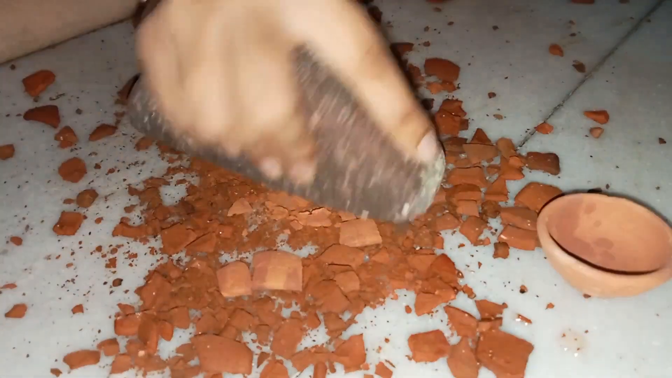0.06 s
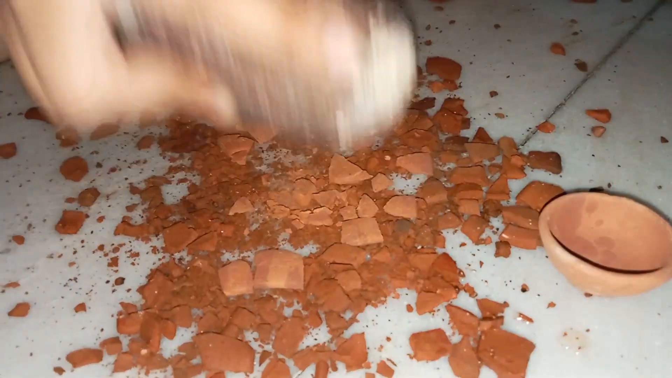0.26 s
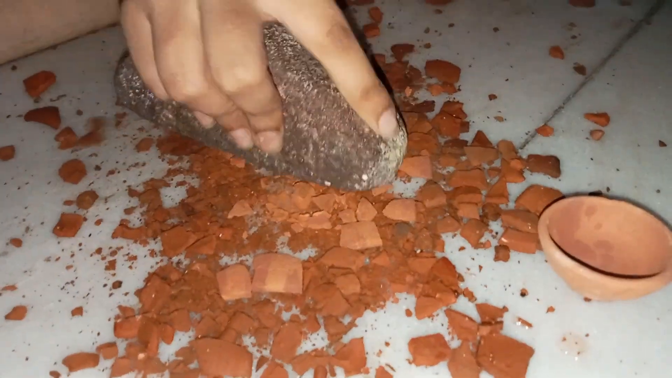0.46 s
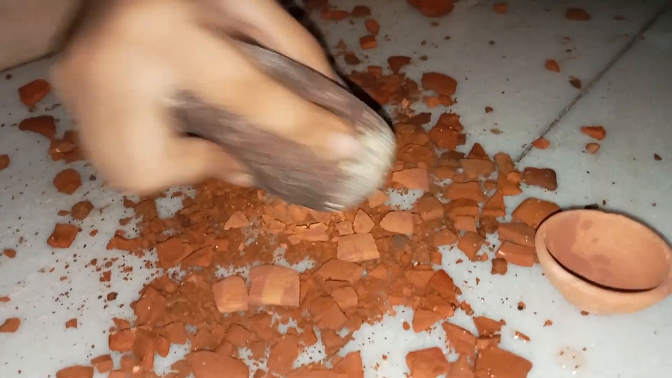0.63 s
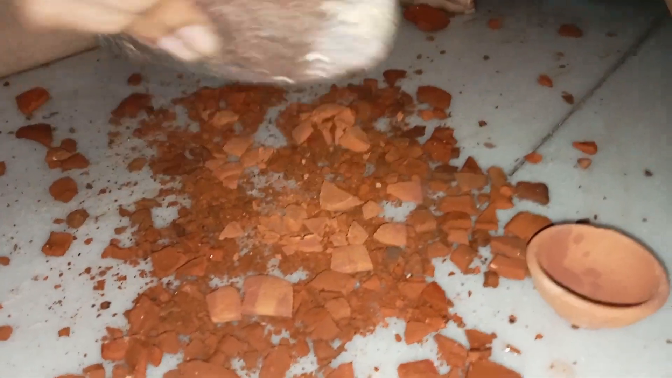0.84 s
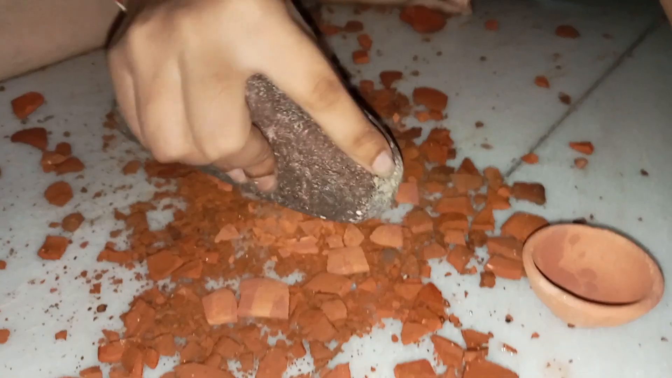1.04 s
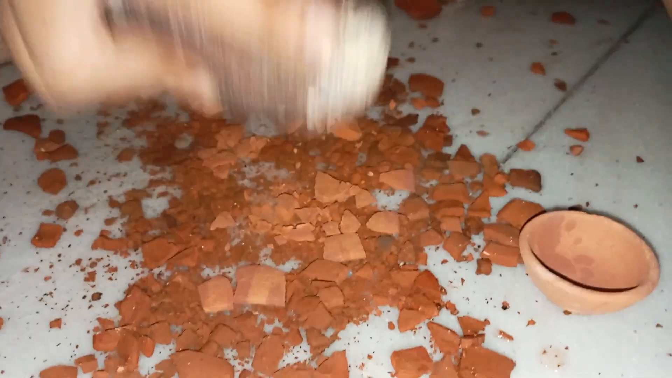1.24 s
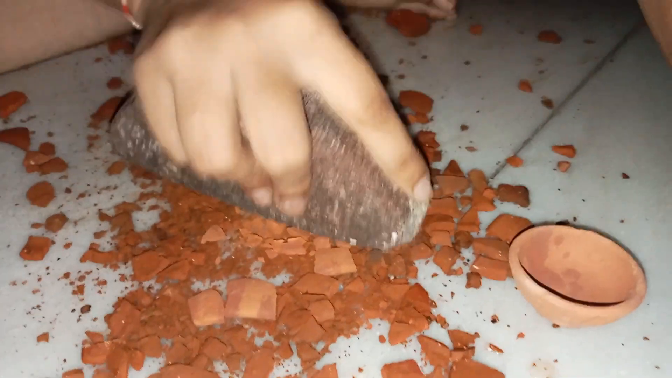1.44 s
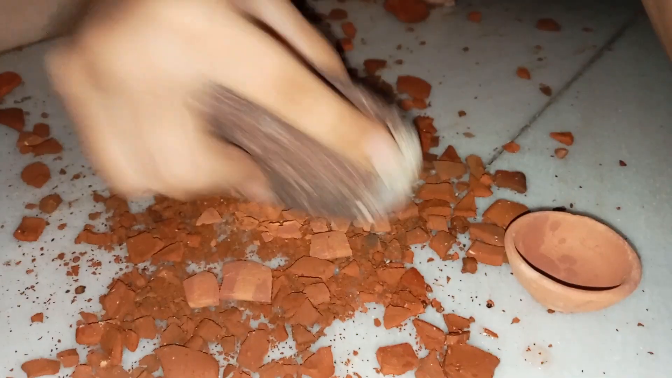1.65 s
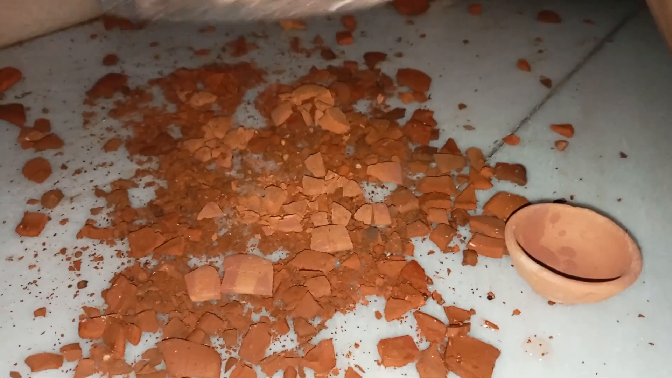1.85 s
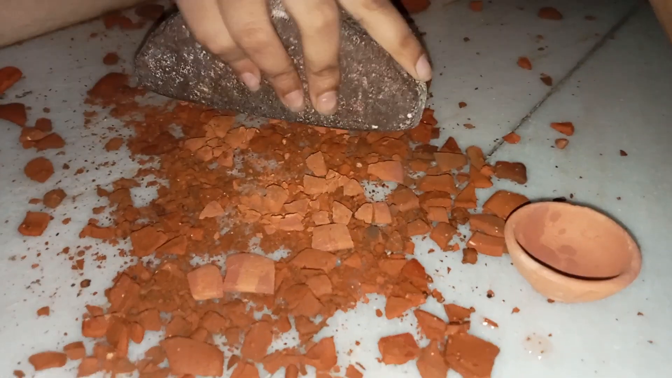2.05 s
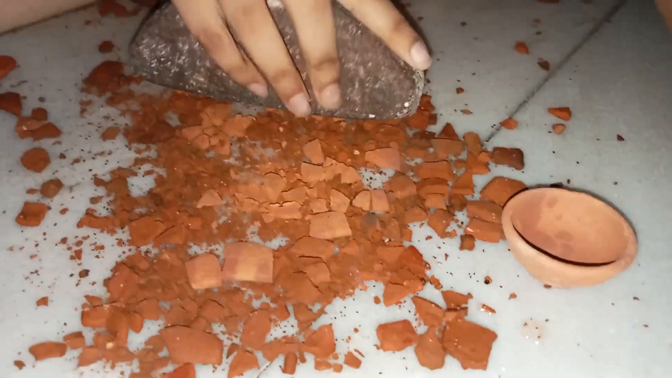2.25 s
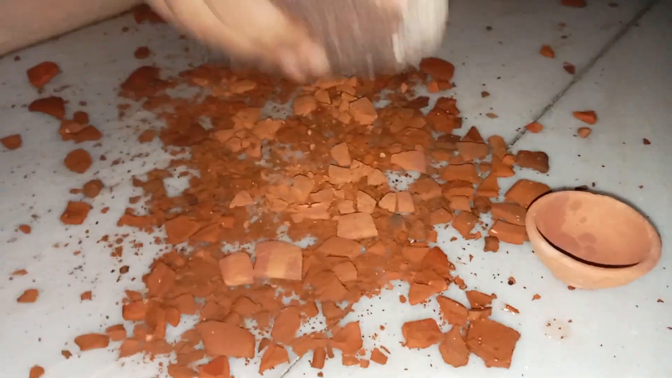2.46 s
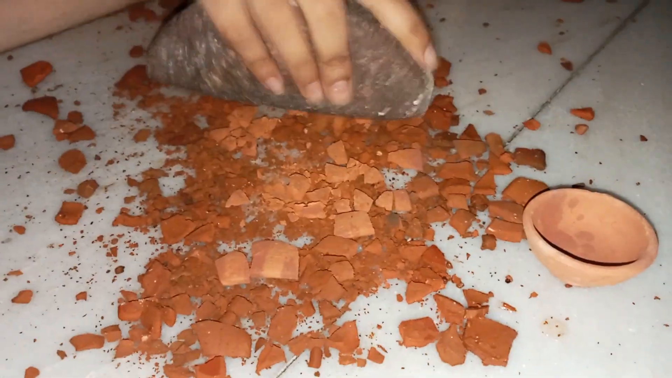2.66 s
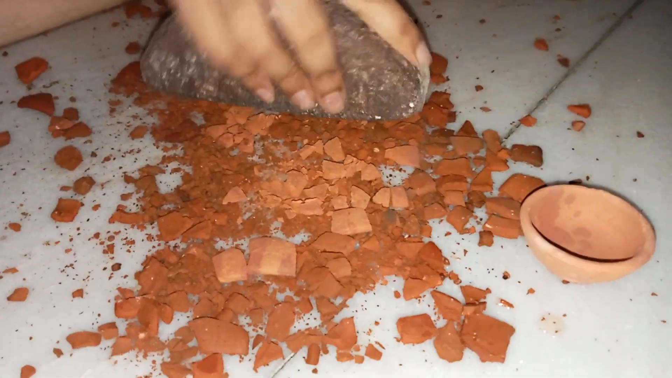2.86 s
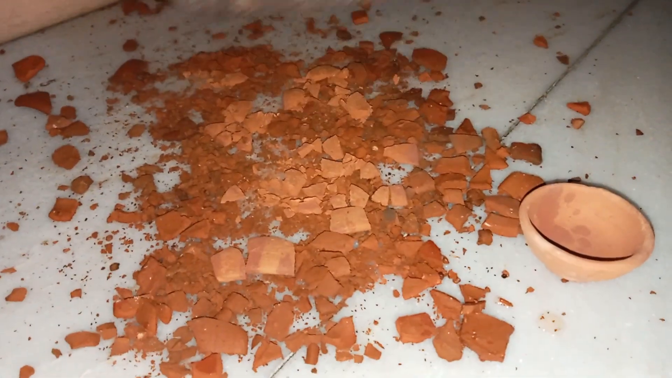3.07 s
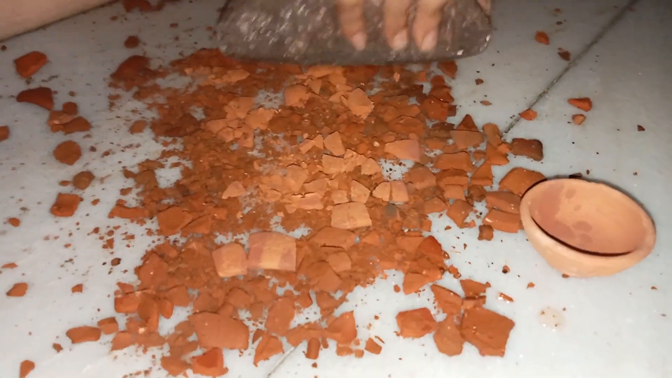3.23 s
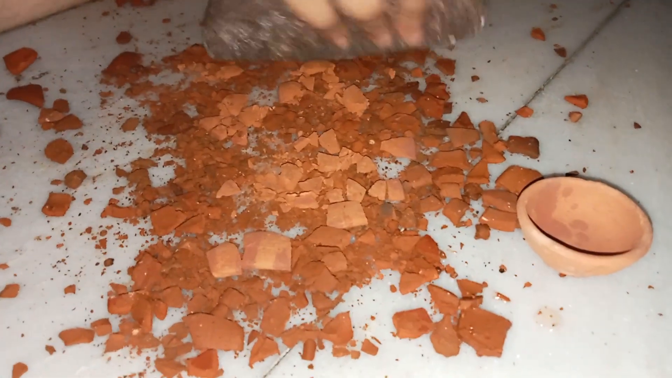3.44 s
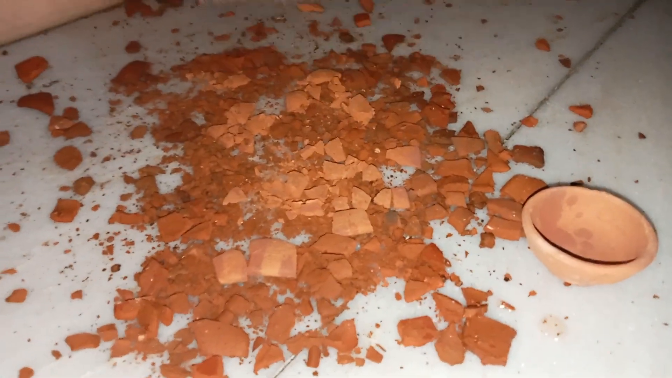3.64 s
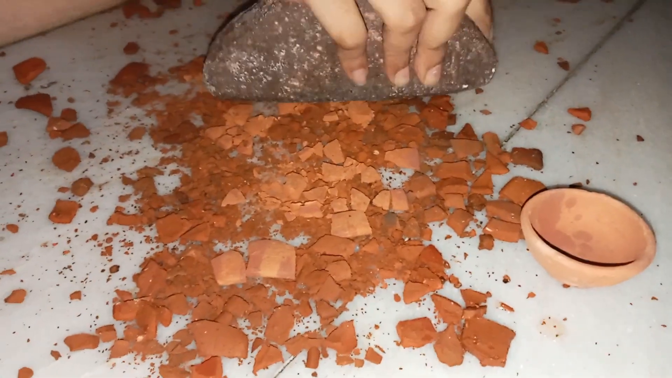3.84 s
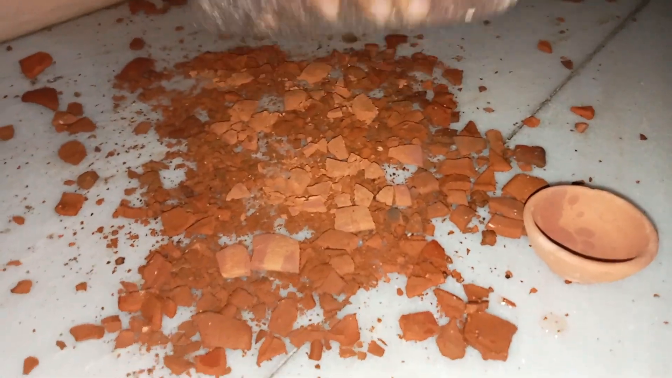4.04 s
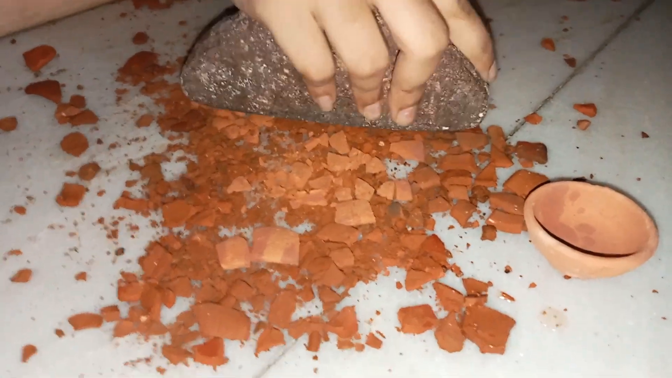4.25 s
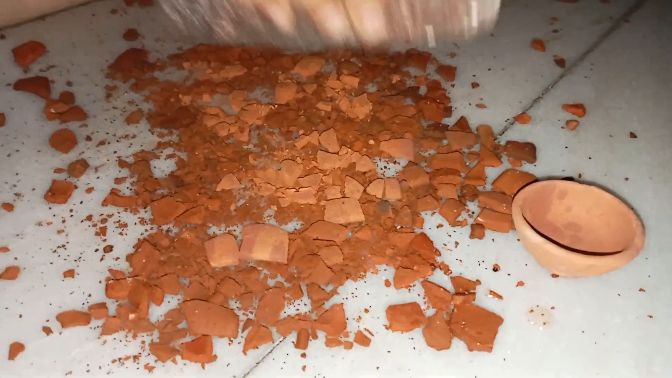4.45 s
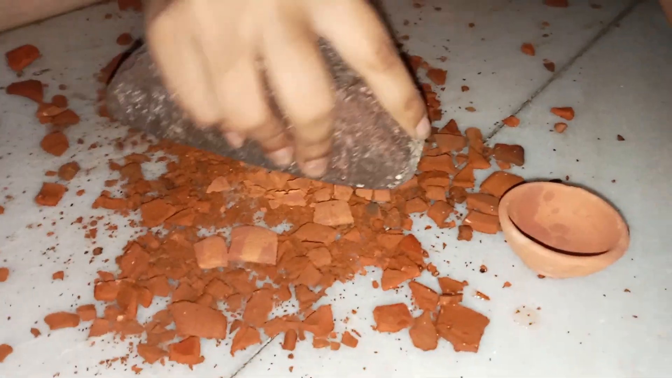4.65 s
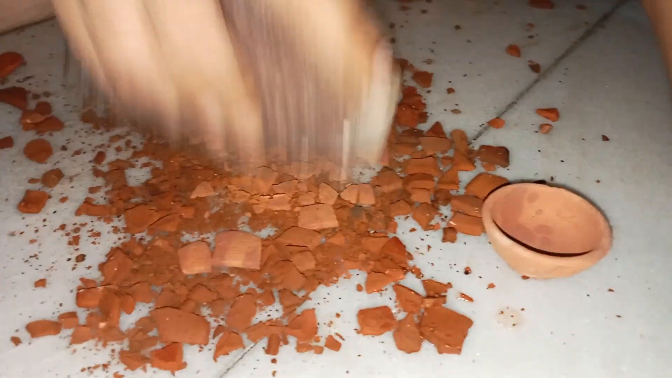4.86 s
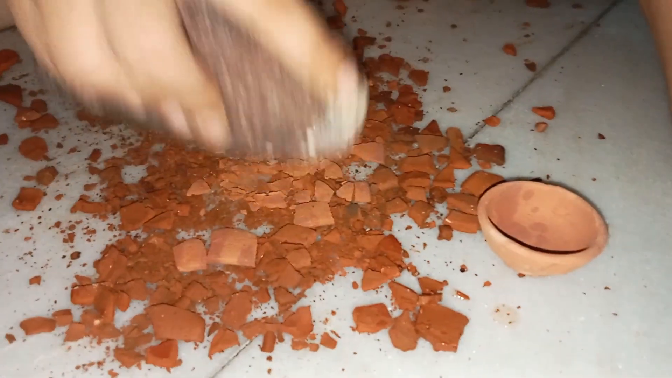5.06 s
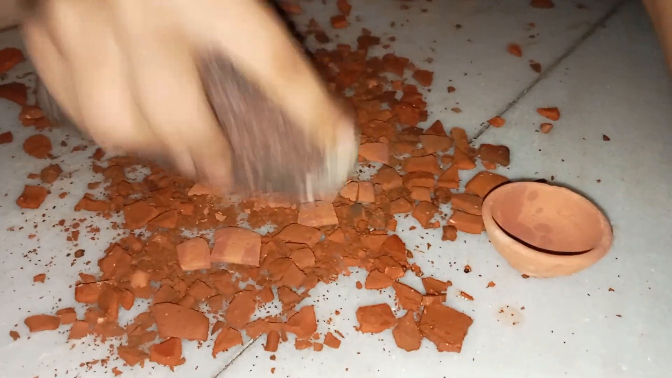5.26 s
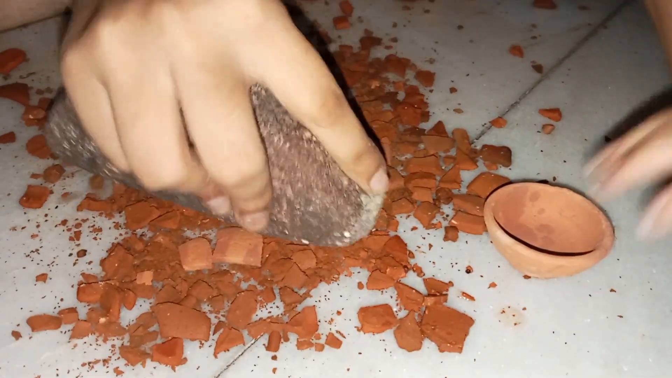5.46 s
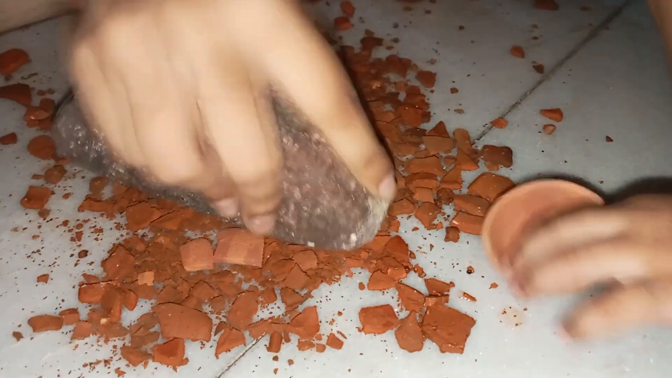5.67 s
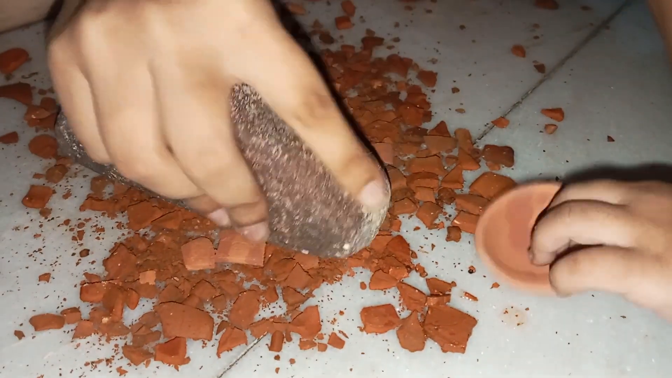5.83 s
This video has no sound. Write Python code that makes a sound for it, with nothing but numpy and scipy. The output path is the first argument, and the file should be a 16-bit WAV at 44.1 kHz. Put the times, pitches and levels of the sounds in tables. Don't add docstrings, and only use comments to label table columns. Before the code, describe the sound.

Fourteen heavy stone blows crack brittle pottery on tile, close and distorted, with ringing room echo, small rebounds and scattering chips.

```python
import sys
import numpy as np
from scipy import signal
from scipy.io import wavfile

SR = 44100
rng = np.random.default_rng(int(sys.argv[2]) if len(sys.argv) > 2 else 0)


def file_out(sig):
    cols = np.atleast_2d(sig).T
    lim = np.clip(cols, -1, 1)
    pcm = np.round(lim * 32767).astype(np.int16)
    wavfile.write(sys.argv[1], SR, pcm)


def attenuation_scalar(level_db):
    decades = np.asarray(level_db, float) / 20
    return 10 ** decades


N = 260190
BUILD_S, BEND = 0.0016, 1.237


def rms_one(x):
    return x / np.sqrt(np.mean(x ** 2) + 1e-20)


def add(out, s, piece):
    at = round(s * SR)
    out[..., at:at + piece.shape[-1]] += piece[..., :N - at]


def at_hz(points, hz, col=1):
    points = np.array(points)
    return np.interp(np.log(hz), np.log(points[:, 0]), points[:, col])


def ring(x, hz, t60):
    r, w = attenuation_scalar(-60 / (t60 * SR)), 2 * np.pi * hz / SR
    return signal.lfilter([0, np.sin(w)], [1, -2 * r * np.cos(w), r * r], x + 1e-18)


def peak(x, hz, width_hz):
    r = np.exp(-np.pi * width_hz / SR)
    top = np.array([1, 0, -1]) * (1 - r * r) / 2
    return signal.lfilter(top, [1, -2 * r * np.cos(2 * np.pi * hz / SR), r * r], x + 1e-18)


def double_peak(x, hz, width_hz):
    return peak(peak(x, hz, width_hz), hz, width_hz)


def port(x):
    return peak(peak(x, 9000, 2440), 9460, 2440) - attenuation_scalar(-10) * double_peak(x, 14500, 3500)


def grains(per_s, spread_db):
    sizes = attenuation_scalar(spread_db * np.minimum(rng.exponential(1, N), 4)) * rng.choice([-1, 1], N)
    return rms_one(sizes * (rng.random(N) < per_s / SR))


def bands():
    edges = np.r_[30 * 2 ** np.arange(0, 6, 1 / 3), 1920 * 2 ** np.arange(0, 3.2, 1 / 8)]
    white = rng.standard_normal((2, N))
    noises = []
    for k, (low, high) in enumerate(zip(edges, edges[1:])):
        sos = signal.butter(2, [low, high], "band", fs=SR, output="sos")
        noises.append((np.sqrt(low * high), high - low, rms_one(signal.sosfilt(sos, white[k % 2]))))
    return noises


# (frequency [Hz], level [dB per Hz])
HUSH = [(30, -27), (60, -2.5), (110, 3), (200, 3.5), (500, -5.5), (1000, -7), (2800, -10.5), (4500, -19),
        (5100, -37), (7000, -47.5), (9600, -36), (12000, -45), (16000, -51.5)]


def hush(noises):
    air = sum(attenuation_scalar(at_hz(HUSH, hz)) * np.sqrt(width_hz) * np.roll(noise, SR) for hz, width_hz, noise in noises)
    return attenuation_scalar(-48) * rms_one(air)


# (frequency [Hz], t60 [s], level [dB])
ROOM = [(57, 0.5, -54), (102, 0.52, -34), (194, 0.51, -28), (467, 0.58, -28.5), (704, 0.55, -27),
        (1240, 0.51, -32.5), (2315, 0.55, -52), (3320, 0.57, -52), (4160, 0.47, -45.5), (5090, 0.51, -69),
        (7100, 0.16, -71), (9820, 0.43, -51.5), (12270, 0.11, -55), (15000, 0.31, -56.5)]
# (frequency [Hz], level [dB], t60 [s])
STANDING = [(101.56, -25, 1), (106.05, -20.5, 0.77), (140.15, -8, 0.52), (159.4, -7, 0.53), (186, -25, 0.7),
            (246, -52, 0.21), (309, -21, 0.15)]
SAME_PATH_HZ = 330
ECHO_LAG_S, LEFTOVER_DB = 0.0021, -24


def room(noises):
    t, out = np.arange(SR) / SR, np.zeros(N)
    build = 1 - np.exp(-t / BUILD_S)
    starts = np.r_[0, np.array(THUDS)[:, 0] + ECHO_LAG_S]
    lump_spread_db = [2.0 if hz < 5000 else 4.5 for hz, *_ in noises]
    lumps_db = rng.standard_normal((len(starts), len(noises))) * lump_spread_db
    for k, (hz, _, noise) in enumerate(noises):
        fade = attenuation_scalar(-60 * (t / at_hz(ROOM, hz)) ** BEND) * build
        power = np.zeros(N)
        clay = np.clip(np.log(hz / 1250) / np.log(1900 / 1250), 0, 1)
        levels_db = np.r_[LEFTOVER_DB, (1 - clay) * thud_db(hz)[:, 0] + clay * crack_db(hz)]
        for s, level_db, lump_db in zip(starts, levels_db, lumps_db[:, k]):
            gain = attenuation_scalar(level_db + at_hz(ROOM, hz, col=2))
            if hz < SAME_PATH_HZ:
                add(out, s, gain * fade * noise[SR:2 * SR])
            else:
                add(power, s, (gain * attenuation_scalar(lump_db) * fade) ** 2)
        out += noise * np.sqrt(power)
    click = np.eye(1, SR)[0]
    standing = sum((-1) ** k * attenuation_scalar(level_db) * ring(click, hz, t60)
                   for k, (hz, level_db, t60) in enumerate(STANDING))
    for s, level_db in zip(starts, np.r_[LEFTOVER_DB, thud_db(120)[:, 0]]):
        add(out, s, attenuation_scalar(level_db - 12) * build * standing)
    return out


# (middle [s], half length [s], level [dB])
DUST = [
    (.68, 0.14, -53),
    (0.965, 0.12, -51),
    (1.368, 0.074, -64),
    (2.49, 0.037, -61),
    (3.238, 0.054, -64.5),
    (3.448, .05, -56),
    (5.097, .008, -48),
    (5.152, .015, -56),
    (5.24, .01, -58),
    (5.83, .05, -71),
]


def dust():
    t = np.arange(N) / SR
    flow = sum(attenuation_scalar(level_db - 3) * np.exp(-((t - s) / half_s) ** 2) for s, half_s, level_db in DUST)
    return port(flow * grains(3400, spread_db=4.0))


# (time [s], peak level [dB], pitch [Hz])
BUMPS = [
    (2.428, -39, 62),
    (2.471, -38, 146),
]


def bumps():
    out, age = np.zeros(N), np.arange(4000) / SR
    for s, level_db, hz in BUMPS:
        swell = age / 0.01 * np.exp(-age / 0.0088)
        add(out, s, attenuation_scalar(level_db + 11.5) * swell * np.sin(2 * np.pi * hz * age))
    return out


# (time [s], bright peak level [dB], ring level [dB], ring pitch [Hz])
CHIPS = [(0.7144, -44, -45, 4030), (0.7861, -54, -31, 2900), (0.8114, -70, -13, 3200),
         (0.844, -35, -47, 3110), (1.1794, -55, -45, 2800), (1.2236, -49, -49, 2800),
         (1.6894, -56, -45, 2870), (1.7345, -53, -46, 2960), (2.387, -61, -25, 4600),
         (3.0394, -56, -51, 3220), (3.473, -40, -48, 3280), (5.2366, -64, -32, 4200),
         (5.284, -37, -30, 4500), (5.8286, -96, -40, 2800), (5.884, -48, -14, 4350)]


def chips():
    out, spits, age = np.zeros(N), np.zeros(N), np.arange(600) / SR
    for s, bright_db, ring_db, hz in CHIPS:
        add(spits, s, attenuation_scalar(bright_db + 3.5) * np.exp(-age / 0.0026))
        swell = age / 0.001 * np.exp(-age / 0.001)
        add(out, s, attenuation_scalar(ring_db - 16) * swell * np.sin(2 * np.pi * hz * age))
    spits = spits * grains(12000, spread_db=3.0)
    return out + port(spits) + attenuation_scalar(-8) * peak(spits, 5000, 4000)


def spray():
    age, flow = np.arange(SR // 2) / SR, np.zeros(N)
    fade_s = 0.13
    add(flow, 0.542, attenuation_scalar(-35.5) * np.exp(-(age / fade_s) ** 1.46))
    return double_peak(flow * grains(5000, spread_db=2.5), 7110, 8000)


# (time [s], pitch [Hz], level [dB])
SINGERS = [(0.058, 5600, -52), (0.058, 9250, -49.5), (0.54, 5020, -41.5), (0.54, 5850, -45),
           (0.54, 7100, -43.5), (0.54, 8470, -47.5), (1.045, 7250, -59), (1.045, 11500, -54),
           (2.072, 7170, -54.5), (2.072, 10500, -51), (2.072, 11820, -49.5), (2.072, 15440, -59.5),
           (2.758, 11060, -55), (4.265, 9400, -53.5), (5.53, 10360, -55), (3.304, 9180, -42),
           (5.53, 8200, -55), (5.775, 9900, -59), (5.775, 4350, -55)]


def singers():
    out, age = np.zeros(N), np.arange(SR // 2) / SR
    rattle = grains(6000, spread_db=3.5)
    width_hz, t60_s = 550, 0.38
    for k, (s, hz, level_db) in enumerate(SINGERS):
        band = double_peak(np.roll(rattle, k * 9001)[:len(age)], hz, width_hz)
        fade = attenuation_scalar(level_db - 60 * (age / t60_s) ** BEND) * (1 - np.exp(-age / BUILD_S))
        add(out, s, fade * rms_one(band))
    return out


# (time [s], peak level [dB], pitch [Hz])
REBOUNDS = [(0.0692, -8, 2400), (0.551, -8, 2010), (1.055, -16, 2300), (1.5467, -0.5, 2600),
            (2.084, -6.5, 2620), (2.7674, -9, 2260), (3.3174, -31, 2100), (3.8377, -8, 2300),
            (4.2774, -19, 2440), (4.693, -14, 2270), (5.01, -3.5, 2320), (5.2821, -9.5, 2430),
            (5.5414, -32, 2340), (5.786, -8.5, 2330)]


def rebounds():
    u, out = np.arange(1000) / SR / 0.0014, np.zeros(N)
    grit = grains(12000, spread_db=2.5)
    for s, level_db, hz in REBOUNDS:
        bite = attenuation_scalar(level_db + 13.5) * u * np.exp(-u) * grit[round(s * SR):][:len(u)]
        burst = double_peak(bite, hz, 800) + attenuation_scalar(-13.5) * double_peak(bite, 4300, 1800)
        add(out, s - 0.001, burst)
    return signal.sosfilt(signal.cheby2(8, 40, 5600, fs=SR, output="sos"), out)


# (time [s], strength [dB], hardness [dB per octave], pitch the landing spot favours [Hz], its lift [dB])
THUDS = [(0.054, 6, 0, 350, 3), (0.537, 5.5, -2, 300.6, 4), (1.041, 0.5, -2, 497, 12.5),
         (1.531, 5, -1.5, 486, 3.5), (2.068, -2, -5.5, 1349, 9.5), (2.753, 2, 1.4, 300, 6.5),
         (3.302, -3, -2.5, 350, 7), (3.823, -2, -3.5, 350, 7.5), (4.262, -5.5, 0.1, 257.6, 13.5),
         (4.677, 1.5, -1.5, 315, 6.5), (4.995, 0, -3, 248, 5.5), (5.267, 1.5, -1.5, 384, 7),
         (5.527, -6, -2.5, 350, 10), (5.7684, 2, -1.5, 150, 1)]


def thud_db(hz, spot_share=1):
    _, strength_db, hard, spot_hz, spot_db = np.transpose(THUDS)[:, :, None]
    spot_octaves = 0.48
    lift = np.exp(-0.5 * (np.log2(hz / spot_hz) / spot_octaves) ** 2)
    return strength_db + hard * np.log2(hz / 250) + spot_share * spot_db * lift


# (frequency [Hz], level [dB], t60 [s])
SLAB = [
    (124, -2.5, 0.12),
    (154.2, 2, 0.67),
    (237.3, 6, 0.075),
    (307.4, 6.5, 0.084),
    (416.3, 2, 0.047),
    (534, -0.5, 0.31),
    (683.3, -9, 0.09),
    (826, -2.5, 0.027),
    (1270, -2.5, 0.021),
]
NEAR_DB = [-3, -7.5, -2.5, 6]
SWELL_S, REST_S = 0.01, 0.012
OVERLOAD_DB, CRUSH_LAG_S = 3, 0.0003
THUD_FOLLOWS = 0.3
SPOT_NEAR = 0.96
IN_STEP_HZ = 350


def thuds():
    out, age = np.zeros(N), np.arange(3000) / SR
    hz, level_db, t60 = np.transpose(SLAB)[:, :, None]
    chance = rng.standard_normal((len(THUDS), 3, len(SLAB), 1))
    shape = (1 - np.exp(-age / SWELL_S)) / (1 + (age / REST_S) ** 2.6)
    near_db = np.array(NEAR_DB)[np.searchsorted([200, 400, 650], hz)]
    for (s, strength_db, *_), share_db, (a, b, c) in zip(THUDS, thud_db(hz.T, SPOT_NEAR), chance):
        mode_db = share_db[:, None] + near_db + level_db + 0.85 * a - 60 * age / t60
        phase = 2 * np.pi * hz * (1 + 0.034 * b) * age + c * hz / IN_STEP_HZ
        thud = shape * np.sum(attenuation_scalar(mode_db) * np.sin(phase), axis=0)
        loudness = attenuation_scalar(OVERLOAD_DB + THUD_FOLLOWS * strength_db)
        add(out, s + CRUSH_LAG_S, thud / np.abs(thud).max() * loudness)
    return out


# (frequency [Hz], level at a mean crack [dB], gain per dB of splinters [dB])
SPLINTER_ECHO = [
    (1930, 0.5, 0.93),
    (3940, 0.5, 0.46),
    (6500, -1, 1.5),
    (10500, -5, 0.72),
]
MEAN_CRACK_DB = -20


def crack_db(hz):
    s, fine_db, _, coarse_db, coarse_hz = np.transpose(CRACKS)
    follows = at_hz(SPLINTER_ECHO, hz, col=2)
    power = attenuation_scalar(at_hz(SPLINTER_ECHO, hz) + follows * (fine_db - MEAN_CRACK_DB)) ** 2
    power = power + attenuation_scalar(coarse_db - 48 * np.log2(hz / coarse_hz) ** 2) ** 2
    for when, _, ring_db in SHATTERS:
        shatter = attenuation_scalar(ring_db - 38.5 * np.log2(hz / 6210) ** 2) ** 2
        power = power + (np.abs(s - when) < 0.1) * shatter
    return 10 * np.log10(power)


# (time [s], fine splinters level [dB], length [ms], coarse pieces level [dB], their pitch [Hz])
CRACKS = [(0.0524, -20.5, 3.7, -13, 2320), (0.535, -12.5, 2.5, 8.5, 2280), (1.041, -13.5, 2.8, 15.5, 2290),
          (1.5298, -17, 2.9, 14, 2730), (2.068, -13.5, 1.83, 5.5, 2600), (2.7512, -22, 3, 9, 2510),
          (3.2991, -14.5, 3.3, 9, 2380), (3.821, -10.5, 2.07, -1, 2310), (4.2589, -22, 4.5, 10.5, 2700),
          (4.676, -28.5, 4.2, 10.5, 2160), (4.9931, -29.5, 3.2, 8.5, 2280), (5.2656, -32, 2.6, 8, 2300),
          (5.5235, -21.5, 5.8, 7.5, 2240), (5.7671, -28, 3.9, 3.5, 2660)]
# (time [s], snap level [dB], ring level in the room [dB])
SHATTERS = [
    (0.053, -0.5, 1),
    (0.535, 11.5, 19.5),
    (3.298, -28, 13.5),
    (4.676, -44, 3),
    (5.523, -45, 1),
]
# (level at a mean crack [dB], gain per dB of splinters [dB])
SIZE_CLASSES = [
    (-8, 0.59),
    (-11, 0.73),
    (-42, 2),
    (-18.5, 1.0),
]
# (frequency [Hz], width [Hz], level [dB])
SHARDS = [
    (1460, 690, 12),
    (2700, 940, 10.5),
    (3944, 575, 16),
    (5200, 930, -27),
    (9580, 730, 14),
    (7250, 2100, -8.5),
    (11250, 2200, -3.5),
    (14700, 1500, 0.5),
]


def cracks():
    age, shapes = np.arange(2000) / SR, np.zeros((4, N))
    mean_db, follows = np.transpose(SIZE_CLASSES)
    for s, fine_db, ms, *_ in CRACKS:
        u = age / (ms / 1000)
        levels_db = mean_db + follows * (fine_db - MEAN_CRACK_DB)
        snaps_db = [snap_db for when, snap_db, _ in SHATTERS if abs(s - when) < 0.1]
        levels_db[2] = max([levels_db[2]] + snaps_db)
        burst = 0.82 * u * np.exp(-u ** 1.43) + 0.043 * np.exp(-u / 4.2)
        add(shapes, s, attenuation_scalar(levels_db[:, None]) * burst)
    clicks = grains(9000, spread_db=6.0)
    out = np.zeros(N)
    for k, (hz, width_hz, level_db) in enumerate(SHARDS):
        shape = shapes[np.searchsorted([3000, 5000, 8000], hz)]
        out += (-1) ** k * attenuation_scalar(level_db) * peak(clicks * shape, hz, width_hz)
    return out


def scene():
    noises = bands()
    low_cut = signal.butter(2, 44.6, "high", fs=SR, output="sos")
    blows = signal.sosfilt(low_cut, cracks() + thuds() + rebounds() + room(noises))
    small = chips() + dust() + bumps() + spray() + singers()
    return (blows + small + hush(noises))[None]


def band_limit(x):
    return signal.sosfilt(signal.butter(12, 16500, fs=SR, output="sos"), x)


def record(dry):
    x, t = dry[0], np.arange(N) / SR
    limit_db, recover_db_s, squeeze, smooth_s = -14, 89, 0.21, 0.035
    over_db = np.maximum(20 * np.log10(np.abs(x) + 1e-9) - limit_db, 0)
    held_db = np.maximum.accumulate(over_db + recover_db_s * t) - recover_db_s * t
    r = np.exp(-1 / (smooth_s * SR))
    x = x * attenuation_scalar(-squeeze * signal.lfilter([1 - r], [1, -r], held_db))
    top_cut = signal.cheby2(14, 60, 16300, fs=SR, output="sos")
    x = signal.sosfilt(top_cut, np.clip(x, -1, 1))
    return band_limit(np.clip(x, -1, 1)[None])


dry = scene()
out = record(dry)
file_out(out)
```